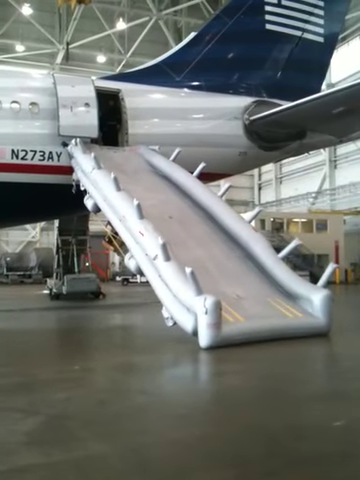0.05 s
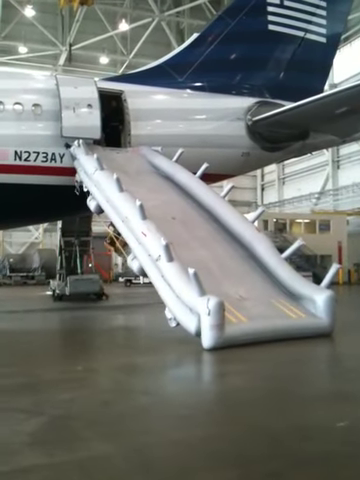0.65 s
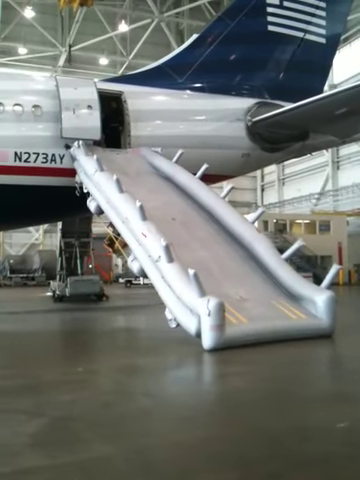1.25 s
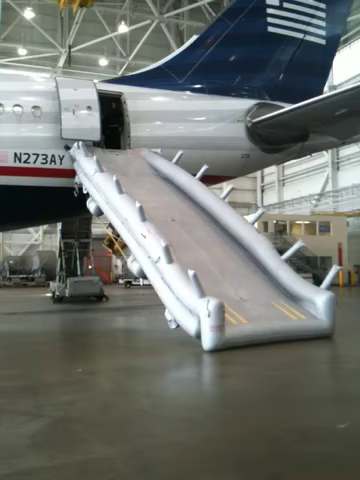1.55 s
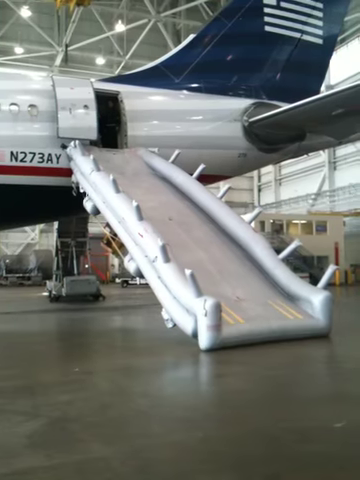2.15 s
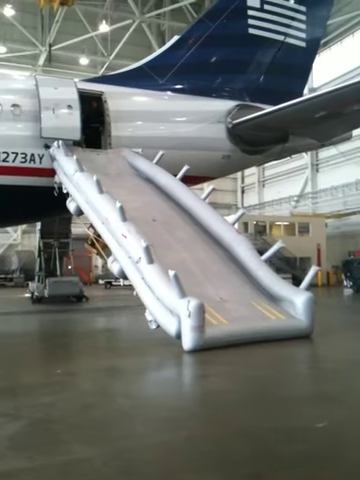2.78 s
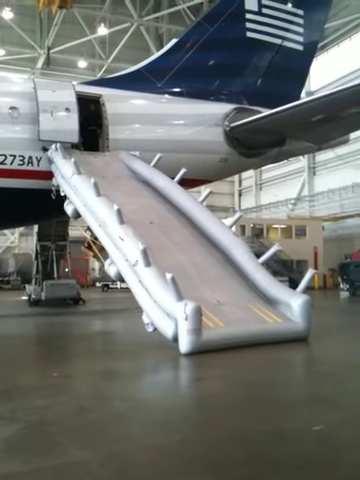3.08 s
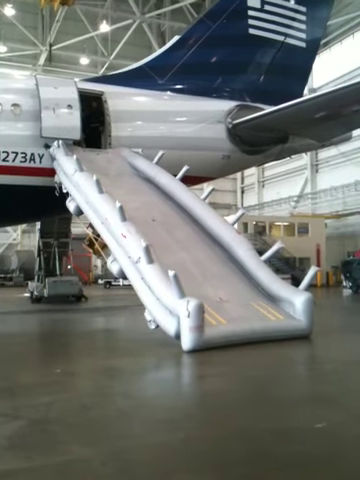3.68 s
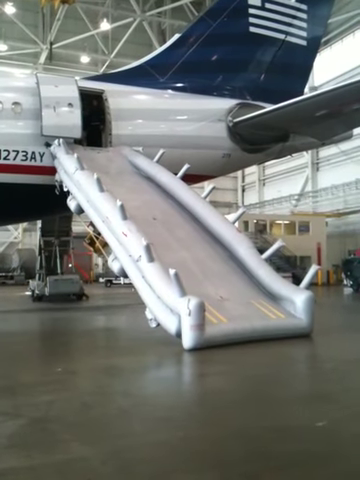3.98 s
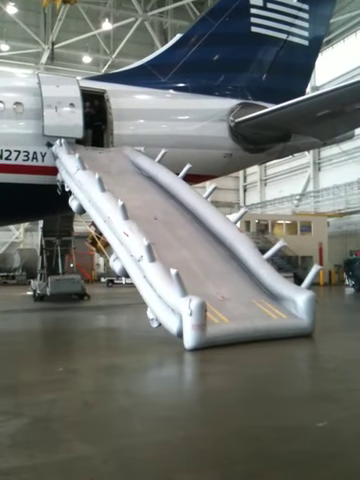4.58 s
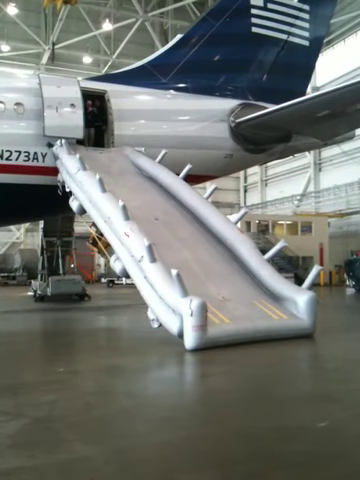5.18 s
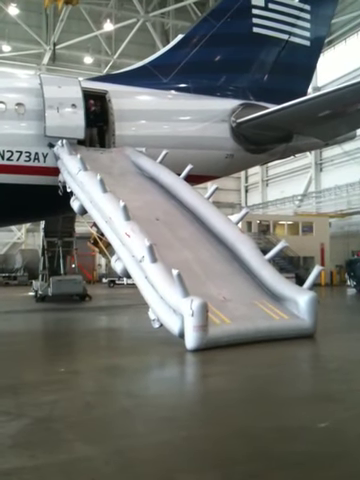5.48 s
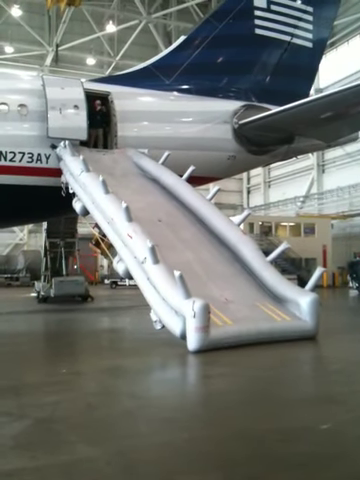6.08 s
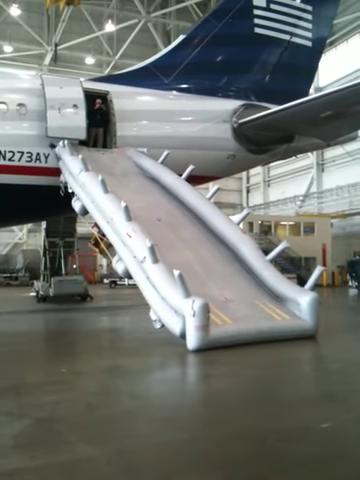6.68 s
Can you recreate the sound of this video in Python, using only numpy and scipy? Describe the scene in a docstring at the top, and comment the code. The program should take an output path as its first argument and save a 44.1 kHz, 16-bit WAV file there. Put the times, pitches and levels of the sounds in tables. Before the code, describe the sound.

Gas hisses steadily into an inflatable escape slide, easing off while shrill, flaring whistles climb and ring through a large hall.

```python
"""Evacuation slide inflating in a hangar

Compressed gas rushes through the aspirator as turbulent noise, shaped by duct resonances and fading as
the bottle empties. The flow sheds edge tones, hopping to ever higher notes that flare and smear in the
reverberant hall. Ventilation rumbles underneath. One microphone hears it all from some way off."""
import sys
import numpy as np
from scipy import signal
from scipy.fft import rfft, irfft, next_fast_len
from scipy.io import wavfile
from scipy.ndimage import uniform_filter1d

SR = 44100
rng = np.random.default_rng(int(sys.argv[2]) if len(sys.argv) > 2 else 0)


def log_audio(samples):
    """Write samples as a 16-bit WAV file to the path given in sys.argv[1]."""
    # one column per channel
    frames = np.atleast_2d(samples).T
    # limit to full scale, then quantise
    limited = np.clip(frames, -1, 1)
    pcm = np.round(limited * 32767).astype(np.int16)
    wavfile.write(sys.argv[1], SR, pcm)


N = 302076
TIME = np.arange(N) / SR


# Spectra of the roar at full and at low bottle pressure, and of the fizz: f/Hz, relative density/dB
FULL_PRESSURE_SPECTRUM = [(100, -60), (300, -37), (550, -21.5), (750, -9.5), (1100, -10), (1400, -1),
                          (2000, -3), (2400, -6.5), (3100, -9), (4200, -4.5), (5100, -9), (6200, -4.5),
                          (7500, -8.5), (8400, -15.5), (9500, -15), (11500, -39)]
LOW_PRESSURE_SPECTRUM = [(100, -60), (300, -34), (550, -15.5), (750, -6), (1100, -4.5), (1400, -0.5),
                         (2000, -4), (2400, -11), (3100, -7), (4200, -7), (5100, -6.5), (6200, -8.5),
                         (7100, -8.5), (8400, -9.5), (9500, -12), (11500, -37)]
FIZZ_SPECTRUM = [(8000, -22), (9800, -13), (10800, -2.5), (12100, 2.5), (12800, 1), (14100, -5.5),
                 (14600, -12), (15800, -19)]
# Resonances of the aspirator and its hoses: f/Hz, width/Hz, gain/dB
DUCT_RESONANCES = [(894, 66, 3), (1410, 540, 1), (1718, 64, 3), (1993, 176, 4.5), (3200, 125, 3.5),
                   (3548, 260, 7), (4060, 240, 4), (4470, 160, 7), (4826, 230, 5.5), (5330, 130, 3.5),
                   (5580, 330, 3.5), (6040, 350, 3), (6630, 160, 5.5), (7390, 220, 5), (8080, 310, 6),
                   (8770, 200, 3.5)]
# Envelopes of the roar and of the fine treble fizz: t/s, level/dB
ROAR_LEVEL = [(0, -20), (1.5, -22), (2.4, -23.1), (4.4, -27), (5.35, -29), (6.85, -30.7)]
FIZZ_LEVEL = [(0, -38.5), (3.6, -41), (4.1, -42), (5.7, -41), (6.1, -45.5), (6.85, -45.5)]
def aspirator_rush():
    """Turbulent flow excites duct resonances; the noise weakens and changes colour as pressure falls."""
    def roar_spectrum(t, hz):
        spent = t / TIME[-1]
        full, low = spectrum_at(FULL_PRESSURE_SPECTRUM, hz), spectrum_at(LOW_PRESSURE_SPECTRUM, hz)
        return (1 - spent) * full + spent * low + bell_response(DUCT_RESONANCES, hz)
    roar = unit_rms(turbulence(roar_spectrum, patchy_db=0.74))
    fizz = unit_rms(turbulence(lambda t, hz: spectrum_at(FIZZ_SPECTRUM, hz), patchy_db=1.6))
    return roar * gain_of(follow(ROAR_LEVEL)) + fizz * gain_of(follow(FIZZ_LEVEL))


# Pitch of each loud whistle from onset to break-off: t/s, f/Hz
LOW_PITCH = [(2.3, 7240), (2.62, 7280), (3.0, 7436), (3.15, 7540), (3.36, 7582), (3.57, 7598)]
HIGH_PITCH = [(3.58, 7764), (3.75, 7767), (3.88, 7798), (4.33, 7846), (4.55, 7887), (4.76, 7898),
              (4.93, 7927)]
SHRILL_PITCH = [(5.79, 9665), (6.05, 9639), (6.38, 9639), (6.85, 9688)]
def loud_whistles():
    """An edge tone moves in stages: the flow hops to a higher note twice as the slide fills."""
    low = whistle(LOW_PITCH, rise_s=0.87, from_db=-43.5, full_db=-23, sag_db_per_s=0.5,
                  waver_hz=6.3, skirt_db=-11, hall_db=-0.5, t60=1.47, octave_db=-39, gain_db=2.35)
    high = whistle(HIGH_PITCH, rise_s=0.66, from_db=-26, full_db=-17.5, sag_db_per_s=4.5,
                   waver_hz=10.5, skirt_db=-17, hall_db=0, t60=1.8, octave_db=-41, gain_db=2.35)
    shrill = whistle(SHRILL_PITCH, rise_s=0.18, from_db=-44, full_db=-31.5, sag_db_per_s=4,
                     waver_hz=3.8, skirt_db=-26, hall_db=-3.5, t60=0.87, octave_db=-70, gain_db=4.5)
    return low + high + shrill


# Flares of the loud whistles: t/s, peak level/dB (before gain_db), duration/s
FLARES = [(2.988, -21, .03), (3.163, -18, 0.024), (3.25, -19, 0.048), (3.416, -17.5, 0.096),
          (3.658, -19.5, .09), (3.851, -17.5, 0.067), (3.983, -16.5, 0.037), (4.041, -13.5, .035),
          (4.087, -13.5, .03), (4.373, -15, .035), (4.432, -15, 0.028), (4.51, -14.5, .025),
          (4.89, -12.5, 0.065), (5.957, -32, .035), (6.026, -27, .03), (6.142, -29, 0.047),
          (6.405, -27.5, 0.029), (6.727, -23.5, 0.034)]
def whistle(pitch, rise_s, from_db, full_db, sag_db_per_s,
            waver_hz, skirt_db, hall_db, t60, octave_db, gain_db):
    """Interference: a locked edge tone beats with its own echoes while it swells in short flares."""
    start, stop = pitch[0][0], pitch[-1][0]
    envelope = gain_of(whistle_level(start, stop, rise_s, from_db, full_db, sag_db_per_s))
    flare_power = sum((gain_of(db) * swell(t, length_s, steepness=6)) ** 2
                      for t, db, length_s in FLARES if start < t < stop)
    flared = np.sqrt(envelope ** 2 + flare_power)
    tone = edge_tone(pitch, waver_hz, waver_rate_hz=60)
    # Earlier pitches linger in the hall; in a flare the direct note stands clear of them.
    heard = tone * flared + gain_of(hall_db) * hangar(tone * envelope, t60)
    # Dividing out the slow level leaves the beats, so the flared envelope alone sets the swell.
    beating = heard / (flared + 1e-9)
    beating /= np.sqrt(abs(uniform_filter1d(abs(beating) ** 2, size=3000)) + 1e-6)
    note = gain_of(gain_db) * np.sqrt(2) * flared * (beating + gain_of(octave_db) * beating ** 2).real
    # Turbulence spreads a wide, weak skirt of sidebands, which the hall smooths out.
    skirt = hangar((tone * envelope * complex_drift(rate_hz=560)).real, t60)
    return note + gain_of(skirt_db) * skirt


def whistle_level(start, stop, rise_s, from_db, full_db, sag_db_per_s):
    """Level in dB of an oscillation that builds, sags and breaks off, leaving a reverberant decay."""
    drop_s, drop_db, ring_db_per_s = 0.017, 3.5, 33
    rise = np.interp(TIME, [start, start + rise_s], [from_db, full_db])
    sag = sag_db_per_s * np.maximum(TIME - start - rise_s, 0)
    since_stop = np.maximum(TIME - stop, 0)
    return rise - sag - drop_db * np.minimum(since_stop / drop_s, 1) - ring_db_per_s * since_stop


def edge_tone(pitch, waver_hz, waver_rate_hz):
    """Turbulence frequency-modulates a jet's tone; the signal is complex, its magnitude the envelope."""
    hz = follow(pitch) + waver_hz * drift(waver_rate_hz)
    blowing = (TIME >= pitch[0][0]) & (TIME <= pitch[-1][0])
    gate = uniform_filter1d(blowing.astype(float), size=600)
    return gate * np.exp(2j * np.pi * np.cumsum(hz) / SR)


# Weak edge tones: start/s, stop/s, f/Hz, climb/Hz, direct peak level/dB, rise/s, fade/s, waver/Hz
FAINT_NOTES = [ (0, 2.0, 6140, 0, -29, .02, .7, 56), (0, 1.6, 9285, 10, -43.5, .3, .6, 45),
               (0, 2.35, 15462, 270, -58, .02, .1, 8), (1.3, 2.95, 6590, 290, -30, 1.0, .25, 32),
               (4.91, 5.28, 13402, 0, -37.5, .02, .15, 14), (5.6, 5.8, 11112, 0, -46, .09, .03, 30)]
def faint_whistles():
    """Weak edge tones fade in and out, their direct and reverberant sound about equal in energy."""
    tones, age = np.zeros(N), np.linspace(0, 1, num=20)
    for start, stop, hz, climb_hz, db, rise_s, fade_s, waver_hz in FAINT_NOTES:
        bend_hz = climb_hz * age ** 3.8  # any climb comes late in the note
        pitch = np.transpose([start + age * (stop - start), hz + bend_hz])
        envelope = np.clip(np.minimum((TIME - start) / rise_s, (stop - TIME) / fade_s), 0, 1)
        tones += gain_of(db) * envelope * edge_tone(pitch, waver_hz, waver_rate_hz=100).real
    return tones + hangar(tones, t60=1.0)


# Spectrum of the ventilation: f/Hz, relative density/dB
VENT_SPECTRUM = [(20, -38), (45, -30), (80, -27), (110, -17), (155, 5.5), (220, -1), (305, 5), (380, 1.5),
                 (560, -1.5), (900, -5.5), (2000, -37), (6000, -50)]
# Swells of a thin whine: t/s, peak level/dB, duration/s
WHINE_SWELLS = [(.37, -40, .25), (4.35, -42, 0.32), (5.05, -40, 0.29), (5.72, -40.5, 0.32),
                (6.52, -43, 0.75)]
def ventilation(air_db=-43, whine_rest_db=-48):
    """Broadband and tonal machine noise: turbulent air rumbles under a fan's hum and a thin whine."""
    air = unit_rms(turbulence(lambda t, hz: spectrum_at(VENT_SPECTRUM, hz), patchy_db=1.0))
    hum = machine_tone(hz=502, db=-56.5, wander_hz=1.44, flicker_db=2)
    lift_db = sum((db - whine_rest_db) * swell(t, length_s, steepness=4)
                  for t, db, length_s in WHINE_SWELLS)
    whine = machine_tone(hz=4016, db=whine_rest_db + lift_db, wander_hz=1.2, flicker_db=0.2)
    return gain_of(air_db) * air + hum + whine


def machine_tone(hz, db, wander_hz, flicker_db):
    """Slight random frequency and amplitude modulation makes a machine's tone waver."""
    cycles = np.cumsum(hz + wander_hz * drift(rate_hz=13.2)) / SR
    return gain_of(db + flicker_db * drift(rate_hz=4.2)) * np.sqrt(2) * np.sin(2 * np.pi * cycles)


def low_swell(peak_db=-44, centre_hz=330, width_hz=190):
    """Narrow-band noise under a bell-shaped envelope is heard as one dull, soft swell."""
    band = complex_drift(width_hz / 2) * np.exp(2j * np.pi * centre_hz * TIME)
    return unit_rms(band.real) * gain_of(peak_db) * swell(t=2.57, length_s=0.12)


def hangar(x, t60, echoes_per_s=4000):
    """Diffuse reverberation: sparse echoes of random sign decay by 60 dB in t60 seconds."""
    t = np.arange(2 * SR) / SR
    echoes = rng.standard_normal(len(t)) * (rng.random(len(t)) < echoes_per_s / SR)
    tail = echoes * gain_of(-60 * t / t60)
    return signal.fftconvolve(x, tail / np.linalg.norm(tail))[:N]


def turbulence(spectrum, patchy_db):
    """Gaussian noise shaped by spectrum(t, hz) in dB, fluctuating in patches of time and frequency."""
    window, hop = 1024, 256
    t = np.arange(N // hop + 5)[:, None] * hop / SR
    hz = np.fft.rfftfreq(window, 1 / SR)
    real, imag, patches = rng.standard_normal((3, len(t), len(hz)))
    patches = uniform_filter1d(patches, size=14, axis=0)
    patches = unit_rms(uniform_filter1d(patches, size=9, axis=1))
    frames = (real + 1j * imag) * gain_of(spectrum(t, hz) + patchy_db * patches)
    return signal.istft(frames.T, nperseg=window, noverlap=window - hop)[1][:N]


def drift(rate_hz):
    """Low-pass noise of rms 1: a random wander that rolls off above the given rate."""
    step = 8
    size = next_fast_len(N // step + 2)
    hz = np.fft.rfftfreq(size, step / SR)
    slow = irfft(rfft(rng.standard_normal(size)) / (1 + (hz / rate_hz) ** 4), size)
    return unit_rms(np.interp(TIME, np.arange(size) * step / SR, slow))


def complex_drift(rate_hz):
    """Two drifts in quadrature give a random amplitude and phase."""
    return drift(rate_hz) + 1j * drift(rate_hz)


def swell(t, length_s, steepness=2):
    """A Gaussian envelope centred on t; greater steepness flattens the top and quickens the edges."""
    return np.exp(-np.minimum(abs(2 * (TIME - t) / length_s) ** steepness, 50))


def bell_response(rows, hz):
    """Gaussian peaks or hollows add in dB to one frequency response."""
    return sum(db * np.exp(-np.log(2) * (2 * (hz - f) / width) ** 2) for f, width, db in rows)


def spectrum_at(points, hz):
    """Linear interpolation of a spectrum on a log-frequency axis."""
    f, db = np.transpose(points)
    return np.interp(np.log(hz + 1), np.log(f), db)


def follow(points):
    """Linear interpolation of a time curve at every sample."""
    return np.interp(TIME, *np.transpose(points))


def gain_of(db):
    """The amplitude ratio of a level in decibels."""
    return 10 ** (np.asarray(db) / 20)


def unit_rms(x):
    """Normalisation to a mean power of 1."""
    return x / np.sqrt(np.mean(abs(x) ** 2) + 1e-20)


def scene():
    """Superposition: all sources add at one microphone, alike in both channels."""
    mono = aspirator_rush() + faint_whistles() + loud_whistles() + ventilation() + low_swell()
    return np.array([mono, mono])


# Hollows in the treble response: f/Hz, width/Hz, gain/dB
TREBLE_HOLLOWS = [(10150, 380, -4.5), (11650, 250, -11), (13520, 280, -11)]
def record(dry, low_cut_hz=55, band_limit_hz=15800):
    """Linear filtering: the treble is hollowed, the bass thinned, and nothing sounds above 15.8 kHz."""
    hz = np.fft.rfftfreq(N, 1 / SR)
    coloured = irfft(rfft(dry) * gain_of(bell_response(TREBLE_HOLLOWS, hz)), N)
    thinned = signal.sosfilt(signal.butter(2, low_cut_hz, "high", fs=SR, output="sos"), coloured)
    low_pass = signal.firwin(511, band_limit_hz, window=("kaiser", 9), fs=SR)
    return signal.oaconvolve(thinned, low_pass[None], "same")


dry = scene()
out = record(dry)
log_audio(out)
```